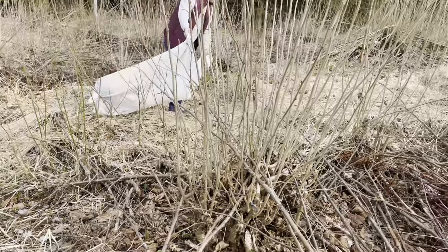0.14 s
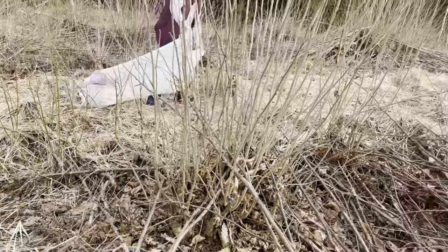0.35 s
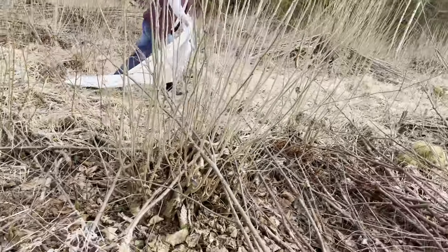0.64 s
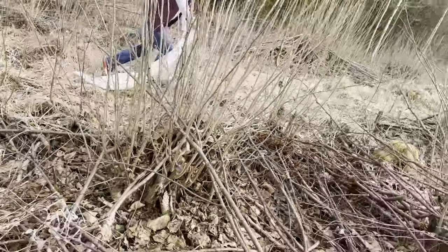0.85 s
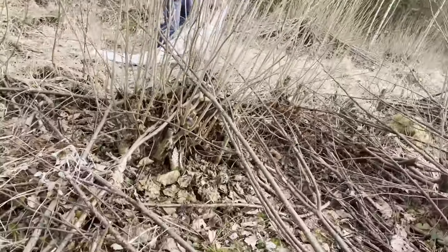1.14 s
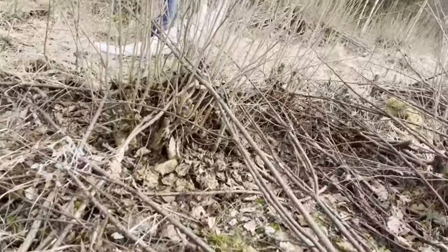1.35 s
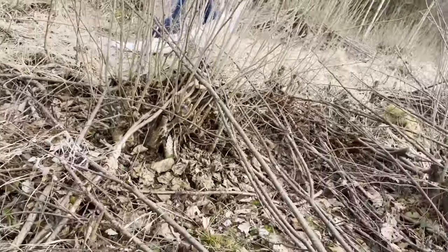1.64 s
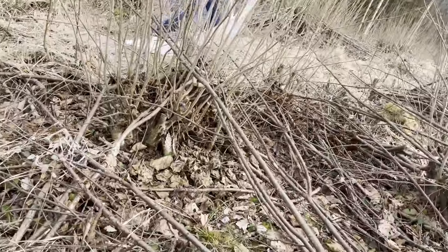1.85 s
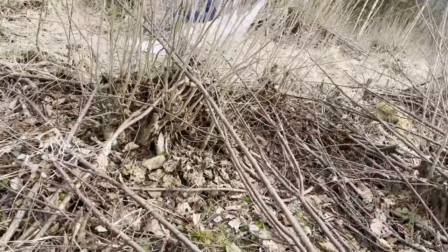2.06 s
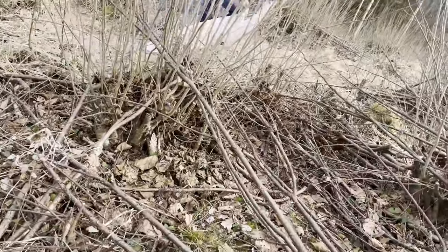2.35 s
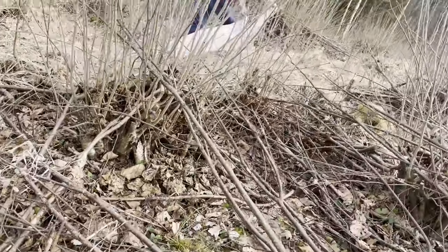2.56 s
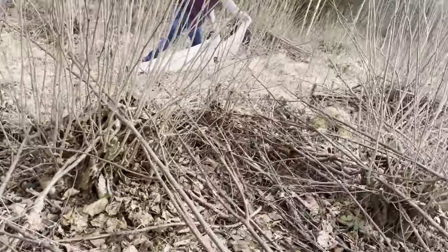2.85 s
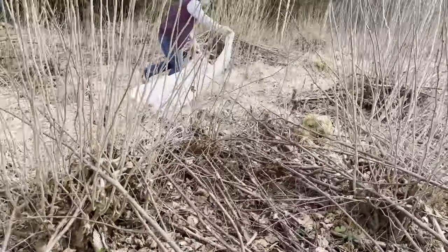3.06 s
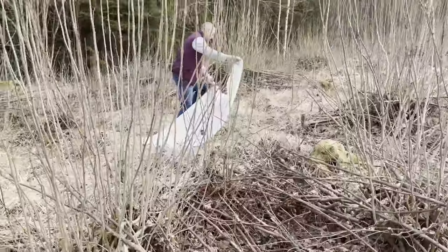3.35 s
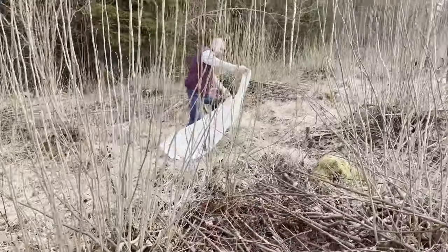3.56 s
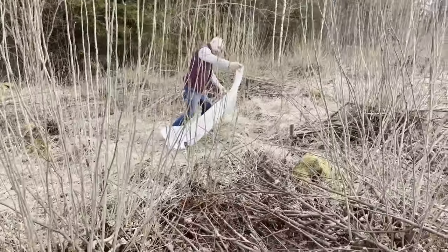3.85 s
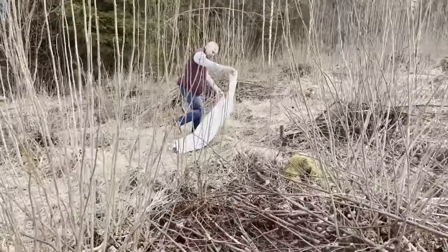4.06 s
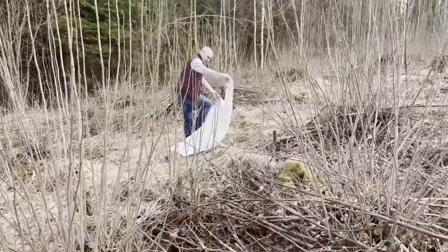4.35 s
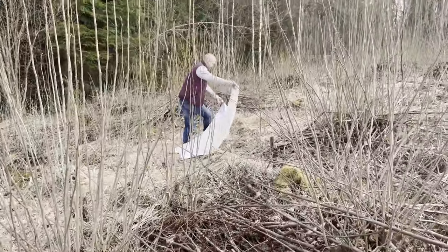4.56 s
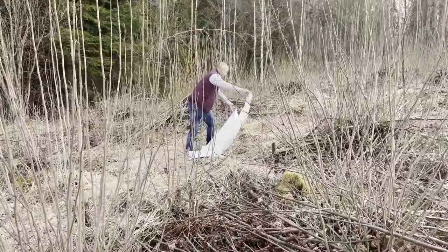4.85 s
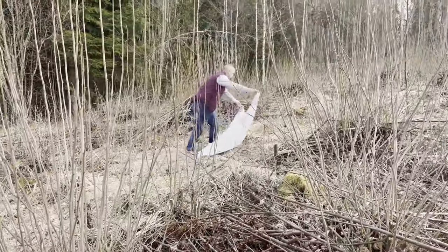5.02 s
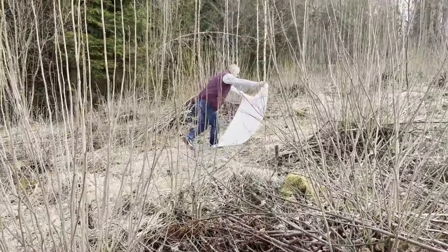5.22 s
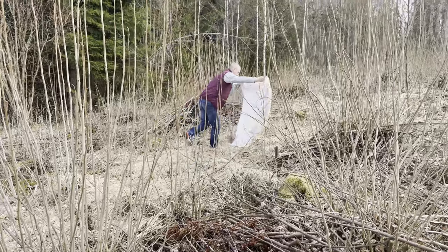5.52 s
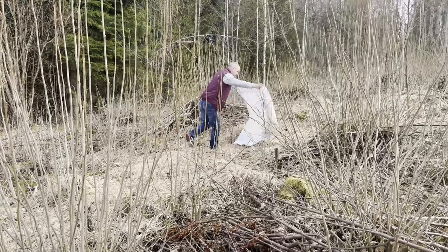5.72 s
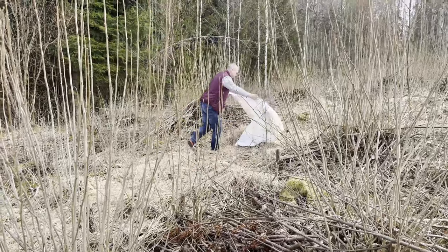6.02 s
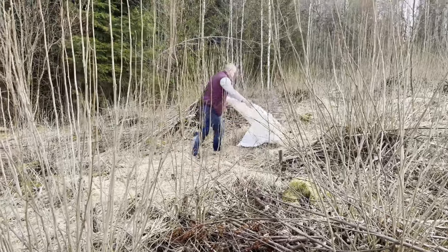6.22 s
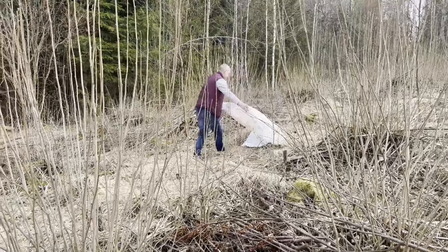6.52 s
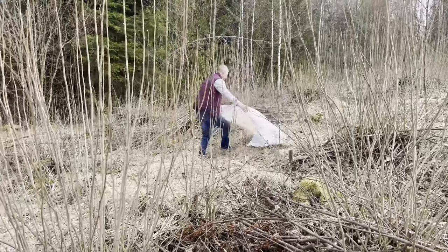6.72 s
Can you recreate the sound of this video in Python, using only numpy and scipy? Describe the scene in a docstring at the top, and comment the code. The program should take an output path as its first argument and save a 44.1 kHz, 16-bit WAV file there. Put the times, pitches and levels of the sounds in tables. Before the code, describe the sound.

Steps and a dragged cloth rustle and crackle through dry grass and brushwood, twigs snapping sharply over a low, lumpy wind rumble.

```python
"""Steps and a dragged cloth rustle dry grass from the start: crackle over hiss, swelling at each sweep.
Wind, lumpy filtered noise, rumbles in two microphone ports over a far wash; a hollow thing close by,
probably the hand-held housing, creaks and knocks in three modes, the two intermingled. Twigs snap, short
bursts with the treble first; dull thumps follow from about 1 s, and a few low throbs of air near the end.
The two ports differ by a phase that turns through the treble."""
import sys
import numpy as np
from scipy import signal
from scipy.fft import rfft, irfft
from scipy.io import wavfile
from scipy.ndimage import uniform_filter1d

SR = 44100
rng = np.random.default_rng(int(sys.argv[2]) if len(sys.argv) > 2 else 0)


def materialize(psi):
    """Save the field psi as 16-bit PCM at rate SR to the path in sys.argv[1].

    A 1-D psi becomes a single channel; in a 2-D psi each row is a channel.
    """
    bounded = np.clip(np.atleast_2d(psi).T, -1, 1)
    quanta = np.round(bounded * 32767).astype(np.int16)
    wavfile.write(sys.argv[1], SR, quanta)


def natural_amplitude(level_db):
    """Convert a level in decibels to a linear amplitude factor, elementwise."""
    exponent = np.asarray(level_db, float) / 20
    return 10 ** exponent


N = 303408

# spectrum of stalks rubbing: (frequency [Hz], gain [dB])
RUB_SPECTRUM = [(1200, -10), (2400, -4.5), (3500, -3), (5000, -4.5), (6500, -4), (8000, -5), (11000, -75)]
# spectrum of the treble fizz: (frequency [Hz], gain [dB])
FIZZ_SPECTRUM = [(5000, -26), (8000, -2), (10000, -7.5), (12000, -11), (14000, -12.5), (15900, -6),
                 (16100, -68)]
# cloth trailing over the grass: (time [s], pull [dB])
DRAG_PULL = [(0, -58.5), (.9, -57), (1.3, -60.5), (1.8, -60.5), (2.2, -62.5), (2.9, -57), (3.5, -59.5),
             (4.1, -58.5), (4.8, -61), (5.29, -61.5), (5.34, -80), (5.42, -63.5), (5.87, -73.5),
             (5.91, -79), (6.0, -72), (6.1, -69.5), (6.3, -63), (6.75, -58.5), (6.88, -67)]
# wind strength: (time [s], level [dB])
WIND_STRENGTH = [(0, -52.5), (.21, -56.5), (.25, -43), (.55, -45), (.63, -52), (1.07, -52), (1.11, -41),
                 (1.38, -50), (1.53, -55), (2.2, -59.5), (2.39, -49), (2.47, -60), (2.68, -45.5),
                 (2.76, -55.5), (4.73, -69), (4.94, -54), (5.59, -58), (6.46, -49.5), (6.88, -48.5)]
# modes of the hollow thing: (frequency [Hz], t60 [s])
HOLLOW_MODES = [(585, 0.041), (720, 0.037), (900, 0.032)]
# offset of the walker to the left: (time [s], share [0-1])
WALKER_BEARING = [(0, 0.93), (1, 1), (2, 0.75), (3, 0.83), (4, 0.7), (4.9, 0.5), (5.1, 0.11), (6.88, 0.45)]


def read(points, hz):
    """A spectrum, straight on a log-frequency axis."""
    f, value = np.transpose(points)
    return np.interp(np.log(hz + 1), np.log(f + 1), value)


def curve(rows):
    """A (time, value) table, sample by sample."""
    s, value = np.transpose(rows)
    return np.interp(np.arange(N) / SR, s, value)


def evened(x):
    """Scales to rms 1."""
    return x / np.sqrt(np.mean(x ** 2) + 1e-20)


def add(mix, s, sound):
    """Mixes a sound in at a time."""
    part = mix[round(s * SR):][:len(sound)]
    part += sound[:len(part)]


def coloured(x, gain):
    """Filters by a gain, a function of frequency."""
    return irfft(rfft(x) * gain(np.fft.rfftfreq(x.shape[-1], 1 / SR)), x.shape[-1])


def shaped(x, spectrum):
    """Filters by a spectrum table in dB."""
    return coloured(x, lambda hz: natural_amplitude(read(spectrum, hz)))


def above(hz, floor_hz):
    """A steep high-pass gain."""
    return 1 - 1 / (1 + (hz / floor_hz) ** 4)


def late(hz, lag):
    """Bending waves: the lower the pitch, the later it arrives; lag in turns of phase per e-fold."""
    return np.exp(-2j * np.pi * lag * np.log(1 + hz / 100))


def lumps(per_s):
    """Slow chance of rms 1."""
    return evened(coloured(rng.standard_normal(N), lambda hz: (hz > 3) / (1 + (hz / per_s) ** 2)))


def crackle(per_s, spread_db, grain_s):
    """Breaking stalks: random puffs of noise, most small and a few large, their power decaying."""
    size = natural_amplitude(spread_db * np.minimum(rng.exponential(1, N), 5))
    size = size * (rng.random(N) < per_s / SR)
    puff = np.exp(-np.arange(600) / (grain_s * SR))
    power = signal.oaconvolve(size ** 2, puff)[:N].clip(0)
    return evened(np.sqrt(power) * rng.standard_normal(N))


def patchy(x):
    """Stalks of unlike size: lifts and dims small patches, some 700 Hz by 12 ms."""
    patch_db = 1.5
    z = signal.stft(x, nperseg=256, noverlap=192)[2]
    patches = uniform_filter1d(rng.standard_normal(z.shape), size=4, axis=0)
    patches = evened(uniform_filter1d(patches, size=8, axis=1))
    return signal.istft(z * natural_amplitude(patch_db * patches), nperseg=256, noverlap=192)[1][:N]


def sweeps(linger, coarse):
    """Power of feet and cloth sweeping the stalks, each swelling to its crest and fading."""
    # (crest time [s], level [dB], swell [s], fade [s], coarseness [dB])
    sweep_rows = [(.3, -57.5, 0.096, 0.14, 11), (.52, -49.5, 0.16, 0.14, 1), (1.05, -62.5, .08, 0.12, -3),
                  (1.57, -51.5, 0.053, 0.048, 8), (2.46, -51, 0.012, 0.15, -4),
                  (2.63, -43, 0.082, 0.077, 1.5), (3.1, -53, 0.017, 0.04, 4), (3.71, -48, 0.034, 0.14, -4),
                  (3.81, -46, 0.092, 0.031, 4), (4.62, -54, 0.19, 0.35, -5), (4.9, -50, 0.012, 0.2, -3),
                  (5.14, -53, 0.18, 0.085, -18), (5.559, -57.5, 0.15, 0.16, -9),
                  (5.85, -62, 0.062, 0.028, -7), (6.24, -53, 0.064, 0.22, 3),
                  (6.57, -52.5, 0.057, 0.13, 12)]
    t = np.arange(N) / SR
    power = np.zeros(N)
    for s, db, swell_s, fade_s, coarse_db in sweep_rows:
        age = np.where(t < s, (s - t) / swell_s, (t - s) / (linger * fade_s))
        power += natural_amplitude(2 * (db + coarse * coarse_db)) * np.exp(-2 * age)
    return power


def rustle():
    """Dense crackle over hiss, clumped, in four parts; the fizz is more hiss than crackle."""
    # stalks scraping: (frequency [Hz], gain [dB])
    scrape_spectrum = [(250, -32), (500, -24), (1000, 1.5), (1600, 3), (2300, 3), (3500, -18), (4500, -26)]
    # fine blades, strongest in the smooth sweeps: (frequency [Hz], gain [dB])
    swish_spectrum = [(3000, -42), (4200, 0), (5500, 4), (6800, -1), (8000, -44)]
    clumps = natural_amplitude(3.9 * lumps(per_s=20.6))
    # two independent draws of the same crackle
    grit_a = crackle(per_s=900, spread_db=1.5, grain_s=0.00047) * clumps
    grit_b = crackle(per_s=900, spread_db=1.5, grain_s=0.00047) * clumps
    # spectrum, grit, grit share, drag dB and sweep dB against the rubbing, linger, coarseness weight
    parts = [(RUB_SPECTRUM, grit_a, 0.54, 0, 0, 1, 0),
             (scrape_spectrum, grit_b, 0.97, -7.5, -18.5, 1, 1),
             (FIZZ_SPECTRUM, grit_a, 0.52, 7, 3.5, 1.2, 0),  # the treble fades slower
             (swish_spectrum, grit_a, 0.18, -10, -15, 1, -1)]
    drag = natural_amplitude(2 * curve(DRAG_PULL))
    out = np.zeros(N)
    for spectrum, grit, share, drag_db, sweep_db, linger, coarse in parts:
        level = np.sqrt(natural_amplitude(2 * drag_db) * drag + natural_amplitude(2 * sweep_db) * sweeps(linger, coarse))
        hiss = rng.standard_normal(N)
        out += level * evened(shaped(patchy(hiss + share * evened(grit)), spectrum))
    return out


def crunches():
    """Small stalks give way at random under cloth and feet, each a few ms of narrow-band noise."""
    crunch_db, crunch_per_s = -12, 110  # level against the rubbing
    out = np.zeros(N)
    for centre_hz in np.geomspace(1100, 4500, 6):
        grit = crackle(per_s=crunch_per_s / 6, spread_db=1.5, grain_s=0.0044)
        band = coloured(grit, lambda hz: 1 / (1 + (3.7 * np.log2((hz + 1) / centre_hz)) ** 4))
        out += band / np.sqrt(centre_hz)
    level = np.sqrt(natural_amplitude(2 * curve(DRAG_PULL)) + sweeps(linger=0.8, coarse=0.73))
    return natural_amplitude(crunch_db) * level * evened(out)


def wind():
    """Lumpy pressure at the ports: a low rumble and a higher buffet that follows it less steeply."""
    # (frequency [Hz], gain [dB])
    rumble_spectrum = [(20, -35), (32, -12), (50, -2), (68, -1.5), (100, -7.5), (140, -13.5), (300, -42)]
    # (frequency [Hz], gain [dB])
    buffet_spectrum = [(50, -79), (110, -0.5), (170, -1), (250, -1), (400, -7.5), (700, -15), (1500, -12.5)]
    rumble_db = curve(WIND_STRENGTH)
    buffet_db = -53 + 0.46 * (rumble_db + 55)
    rumble = shaped(rng.standard_normal(N) * natural_amplitude(1.4 * lumps(per_s=6)), rumble_spectrum)
    buffet = shaped(rng.standard_normal(N) * natural_amplitude(2.0 * lumps(per_s=9.9)), buffet_spectrum)
    gusts = natural_amplitude(rumble_db) * evened(rumble) + natural_amplitude(buffet_db) * evened(buffet)
    return coloured(gusts, lambda hz: 1 / (1 + (hz / 1200) ** 4))  # no treble in the wind


def far_wash():
    """A smooth distant roar, probably far roadside traffic, rising a little with the gusts."""
    # (frequency [Hz], gain [dB])
    far_spectrum = [(150, -15), (300, -5), (600, -5), (950, -7.5), (1400, -19), (3000, -21), (6000, -50),
                    (12000, -89)]
    level_db = -70.5 + 0.37 * (curve(WIND_STRENGTH) + 63)
    return natural_amplitude(level_db) * evened(shaped(rng.standard_normal(N), far_spectrum))


def resonate(x, hz, t60):
    """Shifts the curve hz down to zero, smooths, and shifts back."""
    turn = np.exp(2j * np.pi * np.cumsum(hz) / SR)
    r = natural_amplitude(-60 / (t60 * SR))
    return 2 * (turn * signal.lfilter([1 - r], [1, -r], x / turn)).real


def creaks():
    """A stream of small slips makes the modes hum; the grip shifts their pitch."""
    # (time [s], level [dB])
    creak_level = [(0, -61.5), (.23, -68.5), (.29, -52.5), (.36, -69), (.5, -51), (.62, -73), (1.1, -66),
                   (1.3, -76), (1.6, -78), (1.64, -53.5), (1.7, -60), (1.73, -72), (1.93, -73), (2.01, -58),
                   (2.06, -73), (2.4, -70), (2.44, -63), (2.52, -61), (2.64, -50.5), (2.75, -62.5),
                   (3.0, -64.5), (3.2, -73), (6.88, -76.5)]
    slips = crackle(per_s=300, spread_db=1.0, grain_s=0.0073)
    shift = 1 + 0.025 * lumps(per_s=2.2)
    hum = np.zeros(N)
    for (mode_hz, t60), share in zip(HOLLOW_MODES, (.45, 1, .3)):
        once = resonate(slips, mode_hz * shift, t60)
        hum += share * resonate(once, mode_hz * shift, 0.026)
    return natural_amplitude(curve(creak_level)) * evened(hum)


def snap_burst(noise, db, centre_hz, t60):
    """A faint noise swell leads into each break, a decaying burst with debris that rebounds inverted."""
    lead_in_db, lead_in_s, rise_s, debris_db = -20, 0.0011, 0.00028, -16.5
    rebound, rebound_turns = 0.13, 2.5  # share; delay in periods of the centre
    t = np.arange(4096) / SR - .01
    crack = noise[0] * natural_amplitude(-60 * t / t60) * np.minimum(t / rise_s, 1)
    debris = natural_amplitude(debris_db) * noise[1] * natural_amplitude(-60 * t / 0.1)
    lead_in = noise[1] * natural_amplitude(lead_in_db) * np.exp(np.minimum(t, 0) / lead_in_s)
    burst = np.where(t > 0, crack + debris, lead_in)
    burst[455] += 0.22 / t60 * natural_amplitude(.3 * (db + 10))  # short heavy snaps are one clean break, light ones fray
    return burst - rebound * np.roll(burst, int(rebound_turns / centre_hz * SR))


def snaps():
    """Each twig's burst is heard as a broad middle, a treble spit and a thud, lower pitches later."""
    # (time [s], level [dB], centre [Hz], thud against the middle [dB], t60 [s]); trims and limits below
    snap_rows = [(0.0345, -38, 2920, -13, 0.0064), (.1019, -25, 2370, -18, 0.013),
                 (0.109, -38, 3000, -21, 0.021), (0.196, -40, 4200, -6, 0.018),
                 (0.2575, -23.5, 3440, -14, 0.017), (0.2704, -36, 3800, -23, .011),
                 (0.349, -33.5, 3600, -9, 0.027), (0.4129, -34, 3630, 0, 0.023),
                 (.424, -37.5, 1490, 0, 0.013), (0.471, -32, 4700, -10, 0.087),
                 (.491, -23, 4480, -27, 0.014), (0.4935, -11, 4750, -29, 0.024),
                 (0.572, -32.5, 4530, -4, 0.027), (0.63, -46, 3500, -12, 0.012),
                 (.8, -35.5, 4720, -18, 0.019), (1.193, -33.5, 3050, 2, 0.064),
                 (1.5227, -37, 2930, -9, 0.067), (1.559, -32, 3770, -1.5, 0.051),
                 (1.5882, -26, 4520, -6, 0.029), (2.4285, -35.5, 4850, -7.5, 0.038),
                 (2.558, -28.5, 5300, -24, 0.019), (2.633, -27.5, 2600, -12, 0.032),
                 (2.64, -28, 4000, -16, 0.045), (2.676, -31, 5200, -25, .015),
                 (2.7074, -34.5, 3200, -5, 0.036), (2.771, -37, 5500, -29, .012),
                 (2.8423, -32.5, 4800, -35, 0.017), (2.9121, -35.5, 1500, -4, 0.012),
                 (3.055, -44, 1590, -4, 0.026), (3.078, -27.5, 4670, -21, 0.027),
                 (3.3877, -31.5, 2060, -2.5, 0.015), (3.403, -43, 2220, -11, .02),
                 (3.505, -39, 2000, -13, 0.022), (3.564, -42.5, 1810, -17, .02),
                 (3.583, -42, 1980, -20, 0.033), (3.6937, -7.5, 3790, -22.5, 0.024),
                 (3.926, -37, 2270, -25, 0.022), (4.0317, -35, 5300, -50, 0.054),
                 (4.328, -30.5, 3400, -30, 0.028), (4.465, -45, 1700, -7, 0.012),
                 (4.677, -20.5, 5900, -46, 0.013), (4.8265, -10.5, 2300, -4, 0.013),
                 (4.8347, -27, 4300, -26, 0.057), (4.848, -34.5, 2260, 1, 0.018),
                 (4.8718, -35.5, 2100, 2.5, 0.012), (4.903, -32, 3500, -12, 0.022),
                 (4.9127, -24, 4440, -3, 0.02), (4.9146, -18.5, 2960, -12.5, 0.021),
                 (4.922, -26.5, 3970, -27, 0.042), (4.988, -22, 3720, -14, 0.019),
                 (5.0402, -30, 3300, -2, 0.043), (5.137, -35.5, 2380, -8, 0.0086),
                 (5.469, -43, 3640, -18, 0.016), (5.583, -34, 2740, -16, 0.012),
                 (5.612, -39, 3010, -7, 0.017), (5.9418, -46.5, 2400, -7, 0.015),
                 (6.3464, -22.5, 2540, -9, 0.018), (6.353, -21.5, 4850, -13, 0.03),
                 (6.398, -34.5, 4830, -16, 0.0084), (6.4529, -32.5, 3780, -25, 0.056),
                 (6.493, -36.5, 1800, -7, 0.019), (6.5014, -26.5, 3420, -23, 0.016),
                 (6.508, -38, 3500, -20, 0.014), (6.5407, -29.5, 3200, -29, 0.009),
                 (6.551, -24.5, 3020, -6.5, 0.041), (6.5591, -20.5, 3550, -24, 0.034),
                 (6.592, -29, 4200, -19, 0.021), (6.637, -30, 2210, -12, 0.016),
                 (6.682, -30.5, 2690, -7, 0.02), (6.733, -35, 2670, -15, 0.023),
                 (6.7895, -32.5, 3300, -9.5, 0.012)]
    out = np.zeros(N)
    for s, db, centre_hz, thud_db, t60 in snap_rows:
        burst = snap_burst(rng.standard_normal((2, 4096)), db, centre_hz, np.clip(t60, .005, .06))
        # spit grows with thin twigs, shrinks in heavy breaks, fades as the walker draws off
        spit_db = -0.5 + 7 * np.log2(centre_hz / 3200) - 0.17 * (db + 31.5) - 0.23 * s

        def middle(hz):  # heavier breaks spread wider in frequency
            wide = 0.64 * natural_amplitude(read(RUB_SPECTRUM, hz) / 2 + 0.13 * (db + 25))
            return wide + 1 / (1 + (1.62 * np.log2((hz + 1) / centre_hz)) ** 2)

        def spit(hz):
            return natural_amplitude(read(FIZZ_SPECTRUM, hz)) * above(hz, floor_hz=6200)

        def thud(hz):
            return above(hz, floor_hz=445) / (1 + (0.8 * np.log2((hz + 1) / 750)) ** 4)

        snap = np.zeros(4096)
        for shape, part_db in ((middle, 0), (spit, spit_db), (thud, thud_db - 2.0)):
            part = coloured(burst, lambda hz: late(hz, lag=2.2) * shape(hz))
            snap += natural_amplitude(part_db) * part / abs(part).max()
        add(out, s - .0105, natural_amplitude(db - 2.0) * snap)
    return out


def knocks():
    """Close modes beat after each knock; lighter knocks swell slower and lift the lowest mode."""
    # (time [s], level before a 2.5 dB cut [dB], share of the upper modes [0-1])
    knock_rows = [(0.294, -40, 1), (0.69, -45.5, 0.15), (0.715, -45, 0.4), (0.825, -35.5, 0.52),
                  (1.103, -41.5, 1), (1.198, -13.5, 0.58), (1.264, -37, 0.43), (1.297, -41, 0.8),
                  (1.309, -34, 0.32), (1.375, -44, 0.55), (1.418, -40, 0.4), (1.491, -36, 0.1),
                  (1.648, -41, 0.6), (1.682, -43, 0.6), (2.434, -38.5, 0.87), (2.597, -45, 0.5),
                  (2.626, -29, 0.56), (2.707, -39, 0.7), (2.806, -45, 0.4), (2.868, -38, 0.53),
                  (2.905, -43, 0.7), (4.184, -43, 0.57), (5.043, -36.5, 0.9), (6.555, -29, 0.6)]
    out, t = np.zeros(N), np.arange(5000) / SR
    for s, db, upper in knock_rows:
        light_db = -16 - db
        rise = 1 - np.exp(-t / (.0028 * natural_amplitude(.25 * light_db)))
        modes = []
        for (mode_hz, t60), lift in zip(HOLLOW_MODES, (1 + .0035 * light_db, 1, 1)):
            ring = natural_amplitude(-60 * t / t60) * np.sin(2 * np.pi * mode_hz * lift * t)
            modes.append(ring * rise / rise[100])
        low, middle, high = modes
        knock = (1 - upper) * low - upper * middle + 0.62 * upper ** 2 * high
        add(out, s - .0015, natural_amplitude(db - 2.5) * knock)
    return out


def hollow():
    """The hollow thing: creaks and knocks in the same modes."""
    return creaks() + knocks()


def thumps():
    """Dull thumps through the ground and the hand: one soft push each, smeared into a falling tone."""
    # (time [s], peak [dB], top, scaled below into a corner [Hz])
    thump_rows = [(1.123, -38.5, 169), (1.197, -28.5, 162), (1.262, -41, 145), (1.365, -43, 93),
                  (1.469, -42, 108), (2.349, -39, 127), (2.625, -39.5, 149), (3.688, -35, 201),
                  (4.908, -35.5, 217), (5.437, -40, 93), (6.557, -44, 155)]
    out, push = np.zeros(N), signal.unit_impulse(8192, 441)
    for s, db, top_hz in thump_rows:
        def gain(hz):
            high_pass = (hz / 70) ** 2 / (1 + (hz / 70) ** 2)
            return late(hz, lag=3) * high_pass / (1 + (hz / (1.59 * top_hz)) ** 4)

        thump = coloured(push, gain)
        add(out, s - .012, natural_amplitude(db) * thump / abs(thump).max())
    return out


def throbs():
    """Air at the ports: a few turns of low pressure that swell and fade."""
    # (crest time [s], peak [dB], frequency [Hz], length [s])
    throb_rows = [(6.657, -33, 64, 0.061), (6.78, -42, 68.4, 0.12), (6.831, -38, 62, .04),
                  (6.865, -34.5, 61.3, 0.085)]
    t = np.arange(N) / SR
    out = np.zeros(N)
    for s, db, throb_hz, length_s in throb_rows:
        swell = np.exp(-(3.1 * (t - s) / length_s) ** 2)
        out += natural_amplitude(db) * np.cos(2 * np.pi * throb_hz * (t - s)) * swell
    return out


def ports(x):
    """Left and right split a phase and level difference; below the treble it follows the bearing."""
    # (frequency [Hz], phase lead of the left port [half turns])
    port_turn = [(0, 0), (700, -.05), (1700, .1), (3000, .25), (4100, .1), (5100, .25), (5800, 0),
                 (7200, -.62), (7750, -.98), (8500, -1.02), (9200, -1.33), (10800, -1.85), (12200, -2.01),
                 (12800, -2.35), (14500, -2.97), (16500, -3.03)]
    # (frequency [Hz], left over right [dB])
    port_lean = [(150, 0), (700, 1), (1300, .6), (2400, 2.8), (4400, 5), (6000, 2.5), (7400, 0)]

    def half(hz):
        return np.log(10) / 40 * read(port_lean, hz) + .5j * np.pi * read(port_turn, hz)

    def low(hz):
        return 1 / (1 + (hz / 6000) ** 12)

    mid = coloured(x, lambda hz: np.cosh(half(hz)))
    side = coloured(x, lambda hz: np.sinh(half(hz)) * (1 - low(hz)))
    side += curve(WALKER_BEARING) * coloured(x, lambda hz: np.sinh(half(hz)) * low(hz))
    return np.array([mid + side, mid - side])


def scene():
    """All sources at both ports, plus a part a quarter turn out of phase, opposite in the two ports."""
    # sound unlike in the two ports: (frequency [Hz], gain [dB])
    spread_spectrum = [(60, -15), (250, -6), (700, -3.5), (2000, -6.5), (5000, -2), (7000, -15),
                       (9000, -26), (12200, -15), (14000, -24)]
    shared = ports(rustle() + crunches() + wind() + far_wash() + hollow() + snaps() + thumps() + throbs())
    unshared = wind() + far_wash() + hollow() + curve(WALKER_BEARING) * (rustle() + snaps())
    unshared = coloured(unshared, lambda hz: 1j * natural_amplitude(read(spread_spectrum, hz)))
    return shared + np.array([unshared, -unshared])


def band_limit(x):
    """A steep low-pass at the top of the band."""
    return signal.sosfilt(signal.butter(12, 16500, fs=SR, output="sos"), x)


def record(dry):
    """Takes the two ports as the finished mix."""
    return band_limit(dry)


dry = scene()
out = record(dry)
materialize(out)
```